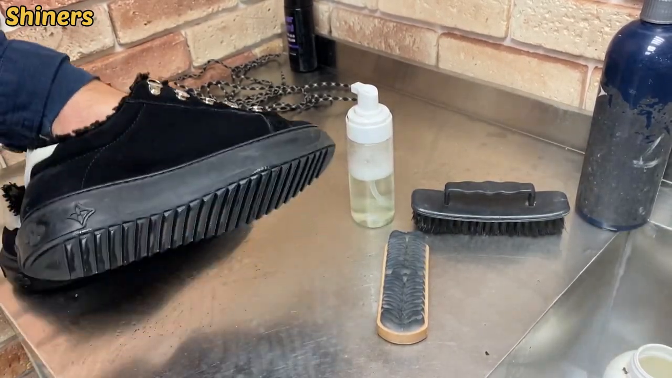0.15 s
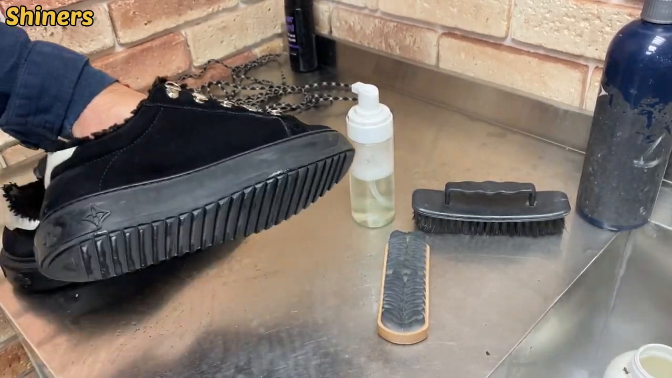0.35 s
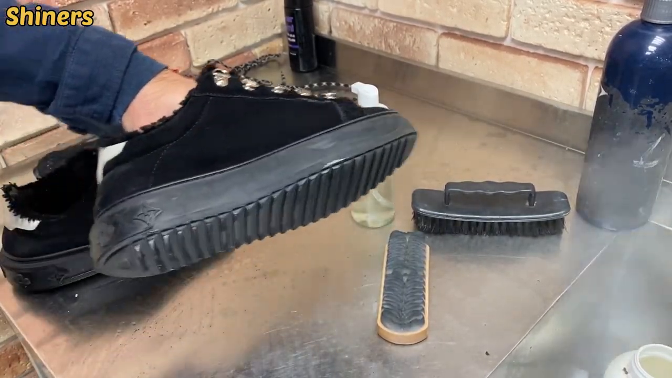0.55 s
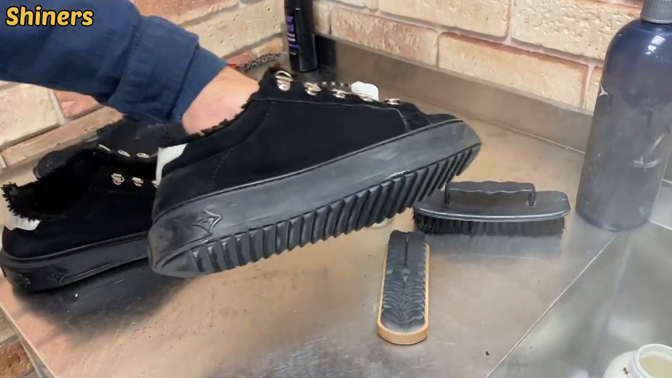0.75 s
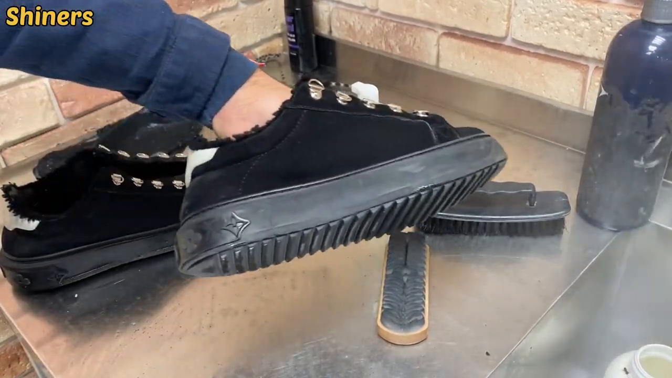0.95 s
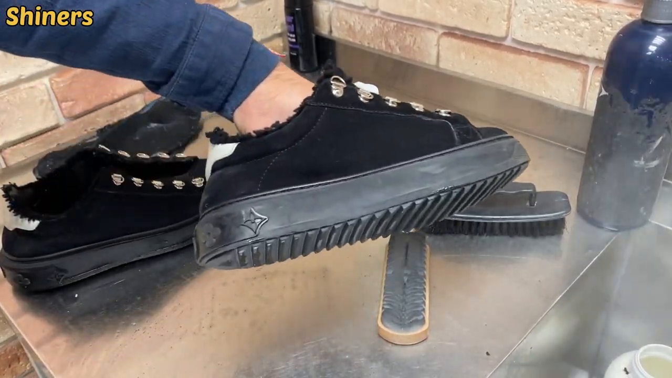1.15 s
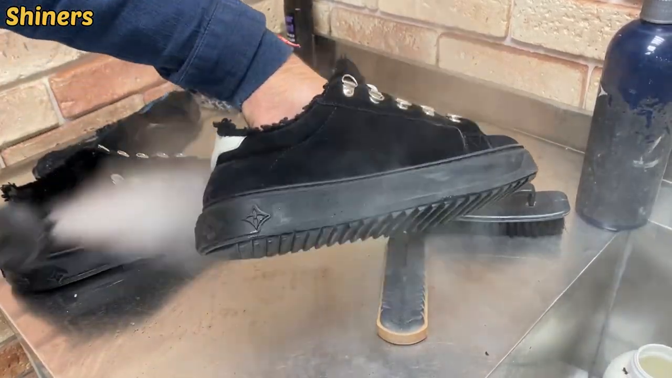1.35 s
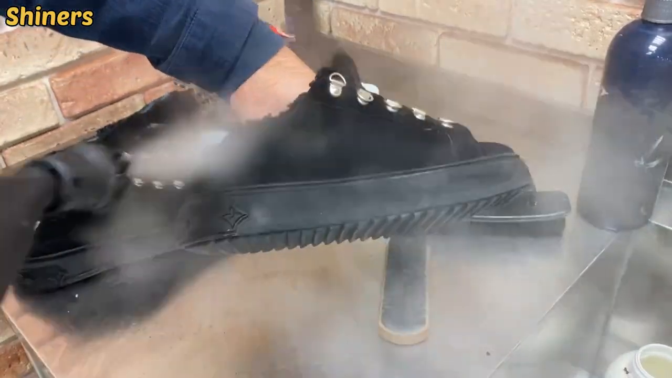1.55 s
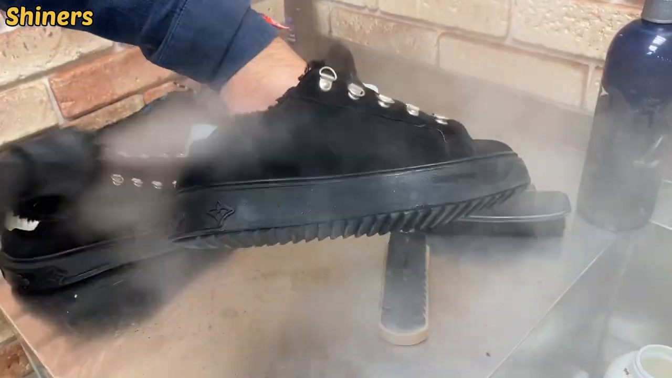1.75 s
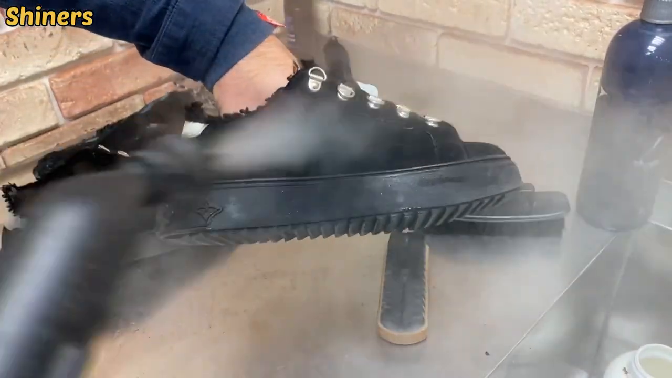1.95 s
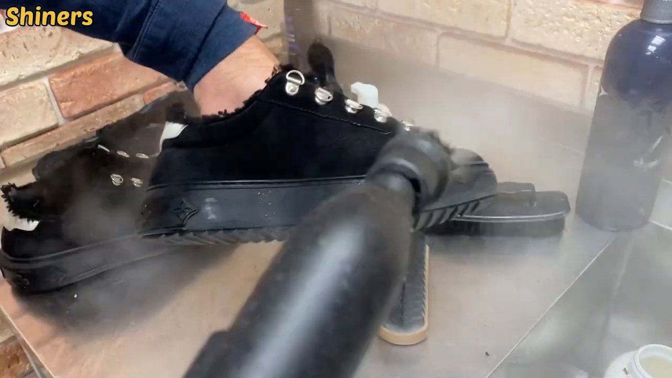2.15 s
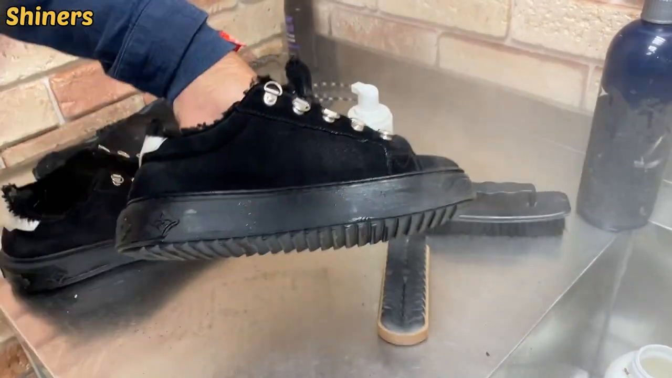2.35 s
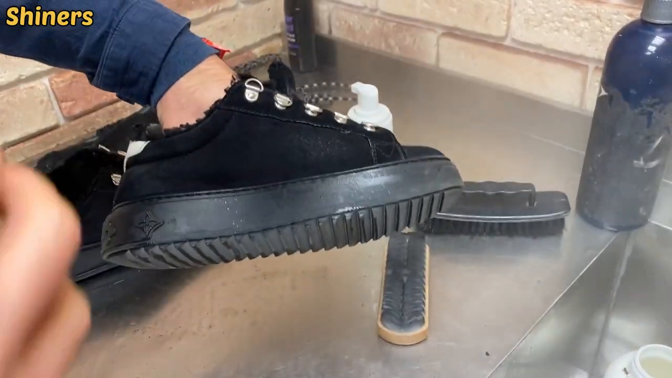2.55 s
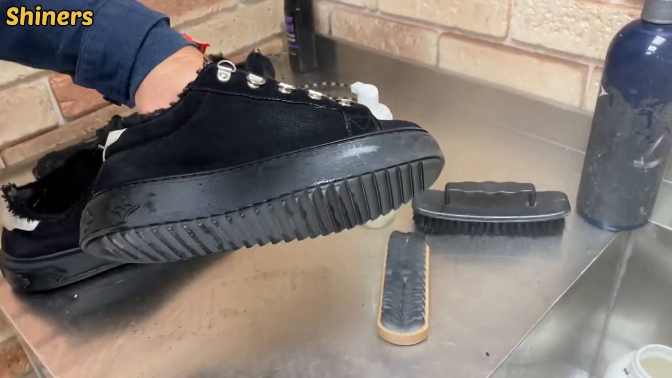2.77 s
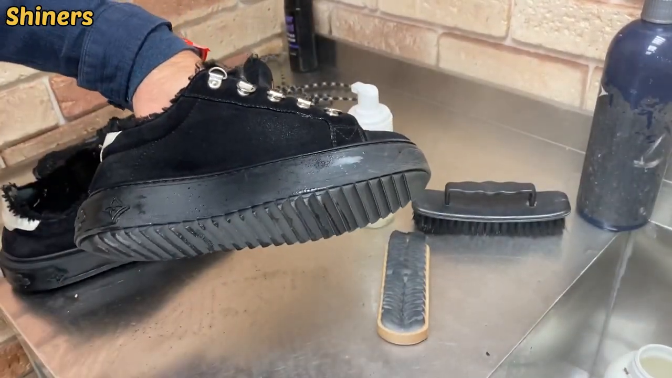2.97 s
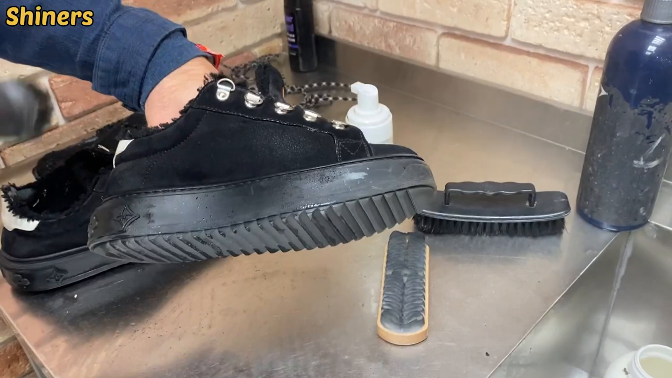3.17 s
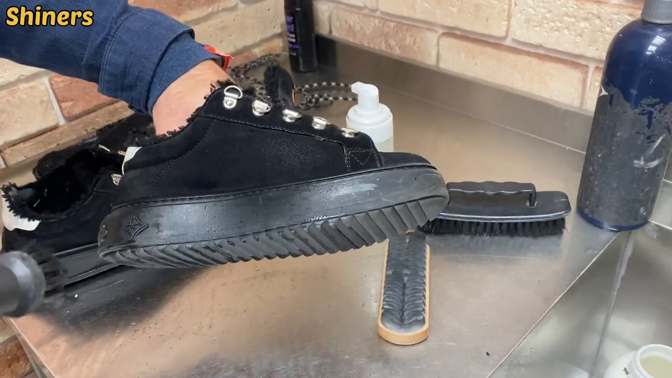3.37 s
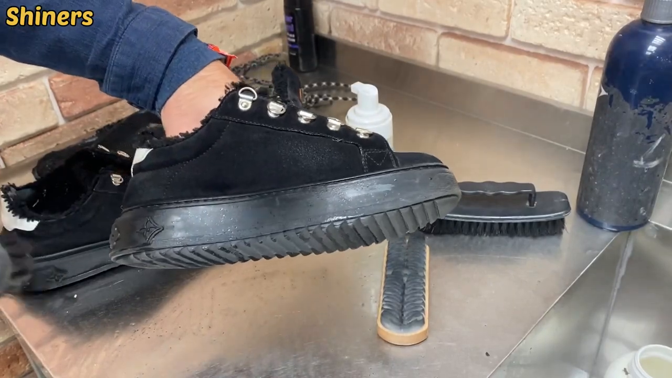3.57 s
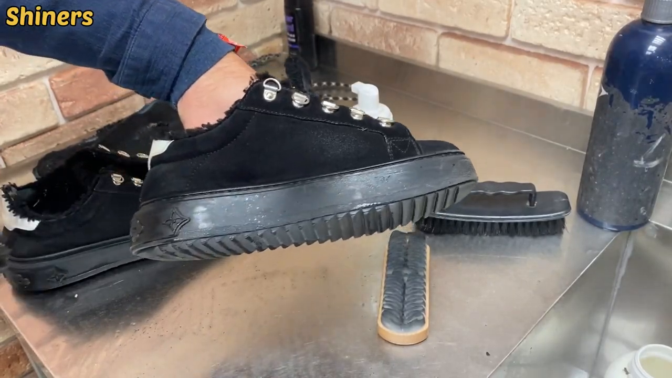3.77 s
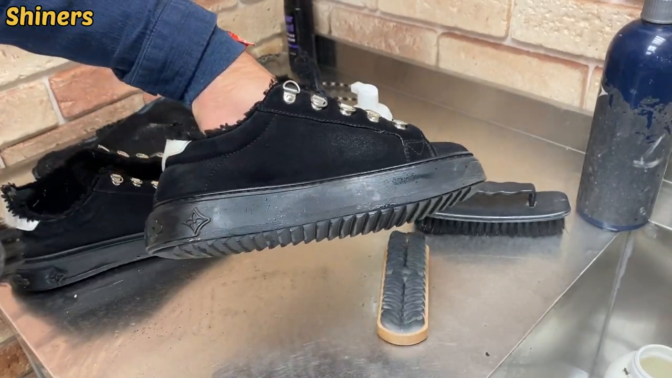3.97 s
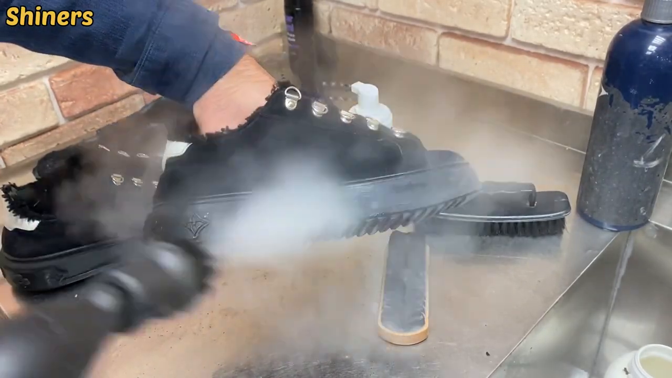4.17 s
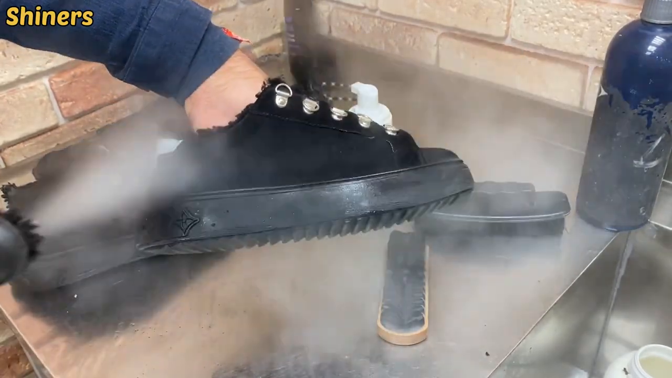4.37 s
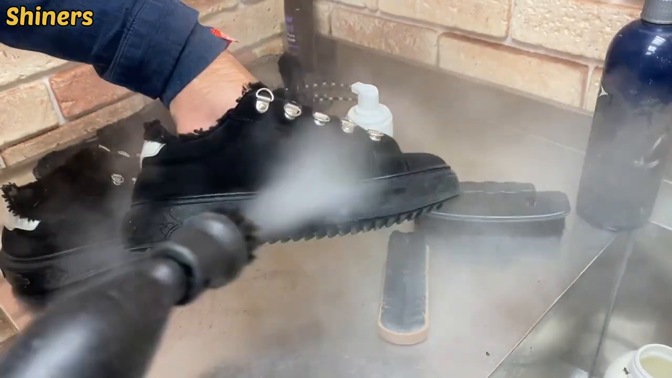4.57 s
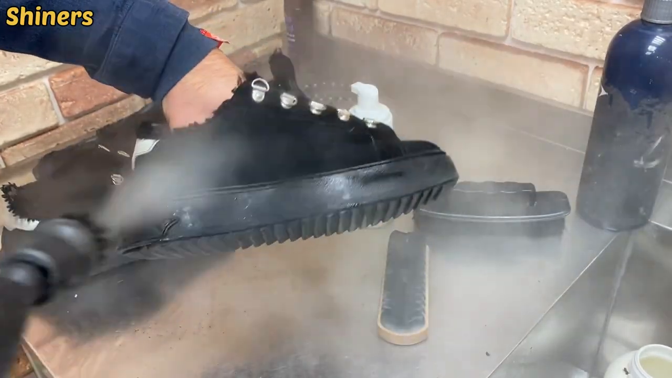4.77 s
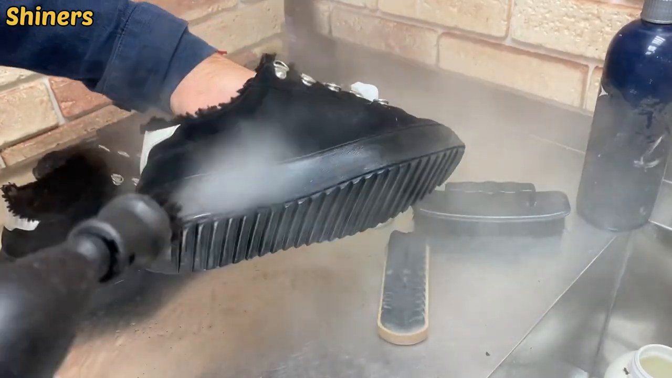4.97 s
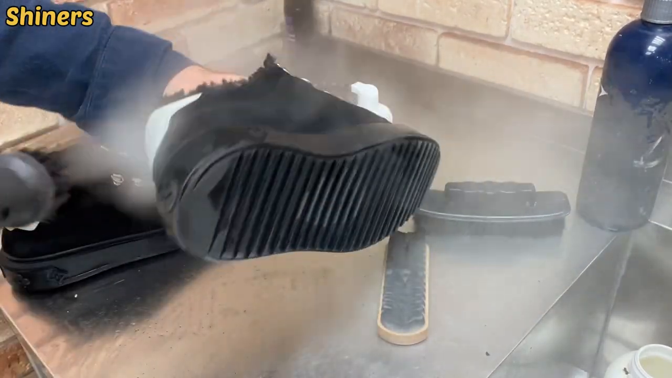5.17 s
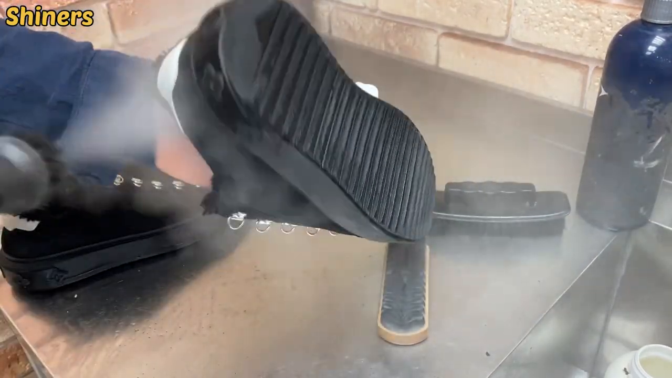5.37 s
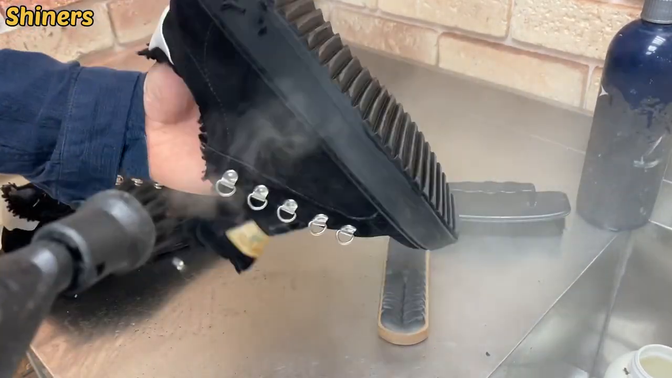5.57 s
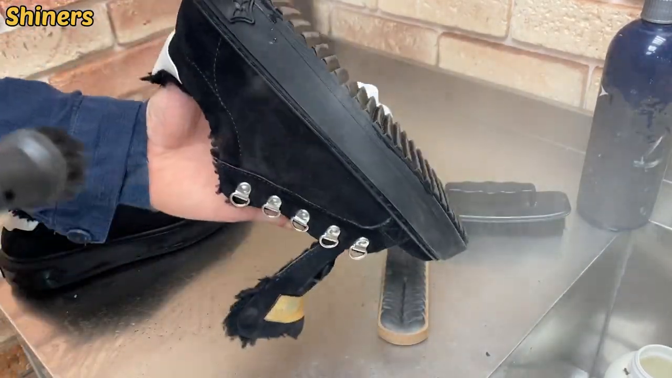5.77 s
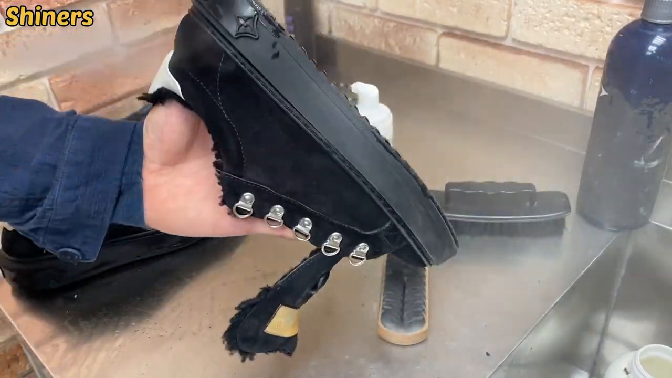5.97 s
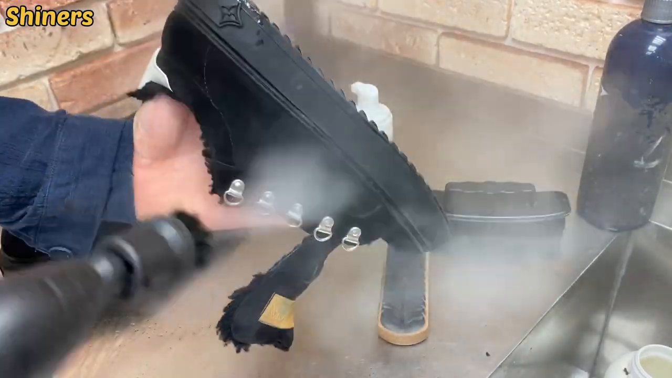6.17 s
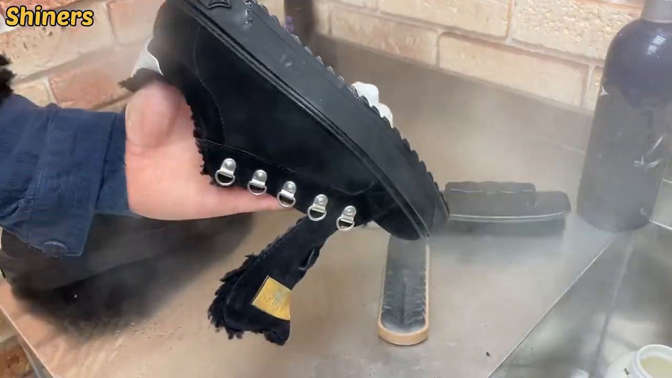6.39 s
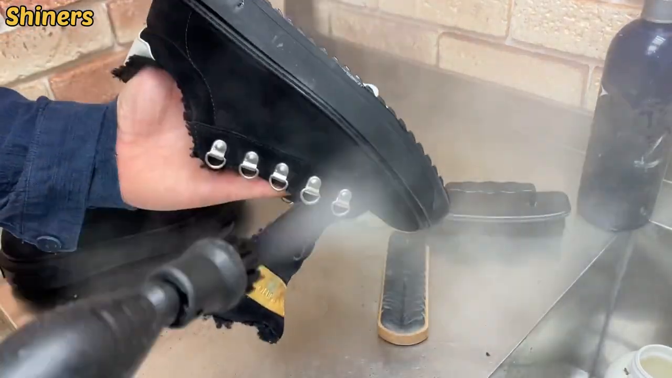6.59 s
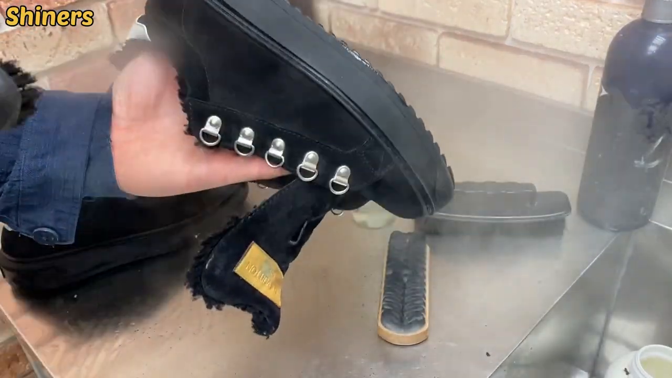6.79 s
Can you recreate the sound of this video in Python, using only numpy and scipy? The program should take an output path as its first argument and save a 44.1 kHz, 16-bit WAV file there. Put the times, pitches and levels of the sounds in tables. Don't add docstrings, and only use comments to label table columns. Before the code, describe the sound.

The tail of an earlier steam puff fades over low workshop rumble, then a steam gun blasts a suede shoe very close: two short wet bursts, then a longer one. In the pause the boiler gurgles, clicks, knocks and drips. A long fourth hiss and a last one follow, running to the end. Small hard-walled workshop, close stereo microphone leaning slightly left.

```python
import sys
import numpy as np
from scipy import signal
from scipy.fft import rfft, irfft
from scipy.io import wavfile
from scipy.ndimage import uniform_filter1d

SR = 44100
rng = np.random.default_rng(int(sys.argv[2]) if len(sys.argv) > 2 else 0)


def volts(x):
    e = np.asarray(x, float) / 20
    return 10 ** e


def master(y):
    cut = np.clip(np.atleast_2d(y).T, -1, 1)
    pcm = np.round(cut * 32767)
    wavfile.write(sys.argv[1], SR, pcm.astype(np.int16))


N = 301203
LEAD = SR // 2
QUADRATURE = np.pi / 2 * np.array([[0], [1]])


def evened(x):
    return x / np.sqrt(np.mean(x ** 2) + 1e-20)


def read(points, hz):
    f, value = np.transpose(points)
    return np.interp(np.log(hz + 1), np.log(f + 1), value)


def hiss(spectrum, length, patchy_db, streaky_db=0., size=1024):
    hz, frames = np.fft.rfftfreq(size, 1 / SR), 4 * length // size + 5
    a, b, chance = rng.standard_normal((frames, len(hz), 2, 3)).T
    patches = uniform_filter1d(chance[0], size=14, axis=0)
    patches = evened(uniform_filter1d(patches, size=8, axis=1))
    streaks = uniform_filter1d(chance[1], size=3, axis=0)
    streaks = evened(uniform_filter1d(streaks, size=30, axis=1))
    streaks = np.minimum(streaks, 1.3)
    level_db = read(spectrum, hz)[:, None] + patchy_db * patches + streaky_db * streaks
    z = (a + 1j * b) * volts(level_db)
    return evened(signal.istft(z, nperseg=size, noverlap=size * 3 // 4)[1][:, :length])


def wobble(length, hz):
    lowpass = signal.butter(1, hz, fs=SR, output="sos")
    return evened(signal.sosfiltfilt(lowpass, rng.standard_normal(length)))


def resonances(modes):
    hz = np.geomspace(100, 20000, num=900)
    gain = sum(volts(db) / (1 + (2 * (hz - f) / width) ** 2) for f, width, db in modes)
    return np.transpose([hz, 20 * np.log10(gain)])


def shell(modes):
    return hiss(resonances(modes), N, patchy_db=2.5)


def lumps(rows, rise_s, fall_db_per_s):
    t, gain = np.arange(N) / SR, np.zeros((2, N))
    for s, hold_s, db, upper_db in rows:
        part = slice(round(s * SR), round((s + hold_s + .4) * SR))
        u = t[part] - s
        fall = volts(-fall_db_per_s * np.maximum(u - hold_s, 0))
        gain[:, part] += volts([[db], [db + upper_db]]) * np.minimum(u / rise_s, 1) * fall
    return gain


def blips(rows, low, high, clear):
    size = 9000
    out, t = np.zeros((2, N + size)), np.arange(size) / SR
    low, high = np.pad([low, high], ((0, 0), (0, 0), (0, size)))
    rise = np.sin(np.pi / 2 * np.minimum(t / 0.0042, 1)) ** 2
    for s, db, hz, t60_s, width_hz, low_db, high_db in rows:
        part = slice(round(s * SR), round(s * SR) + size)
        peak = signal.iirpeak(hz, hz / width_hz, SR)
        noise = signal.lfilter(*peak, signal.lfilter(*peak, rng.standard_normal((2, size))))
        tone = np.sqrt(2) * np.sin(2 * np.pi * hz * t + QUADRATURE)
        ring = clear * tone + (1 - clear) * evened(noise)
        ring += volts(low_db) * low[:, part] + volts(high_db) * high[:, part]
        out[:, part] += ring * volts(db - 60 * t / t60_s) * rise
    return out[:, :N]


def struck(s, modes, rise_s, spread_db):
    t, out = np.arange(min(SR // 2, N - round(s * SR))) / SR, 0
    for (hz, db, t60_s), (phase, odd) in zip(modes, rng.standard_normal((len(modes), 2))):
        wave = np.sin(2 * np.pi * hz * t + 4 * phase + QUADRATURE)
        out = out + np.sqrt(2) * wave * volts(db + spread_db * odd - 60 * t / t60_s)
    return out * np.minimum(t / rise_s, 1) * np.minimum((t[-1] - t) / .1, 1)


def placed(blows):
    out = np.zeros((2, N))
    for s, sound in blows:
        out[:, round(s * SR):][:, :sound.shape[1]] += sound
    return out


# time_s, level_db
LOAD = [(0.0, -45), (0.25, -48.5), (0.42, -38), (0.68, -54.5), (0.78, -40.5), (1.16, -47.5), (1.48, -44),
        (2.68, -55.5), (2.78, -45.5), (3.73, -56), (4.13, -48.5), (5.4, -52.5), (5.55, -48), (5.76, -63.5),
        (6.03, -48), (6.83, -50)]
# freq_hz, density_db
RUMBLE_COLOUR = [(8.8, -41), (15, -8.5), (43, -8), (59, -1.5), (76, 4.5), (87, -6.5), (97, -14.5),
                 (110, -28.5), (140, -52.5), (240, -120)]
# freq_hz, density_db
HUM_COLOURS = [
    [(95, -42.5), (116, -15.5), (125, 13), (134, -9), (160, -53), (300, -120)],
    [(170, -38), (205, -15.5), (215, 2.5), (225, -7), (260, -42.5), (450, -120)],
]
# steam_roar_db, gurgle_db, rumble_db, fall_db_per_s
HUM_STIR = [(-17, -14.5, -11, 78), (-19.5, -27.5, -25.5, 91.5)]
# freq_hz, density_db
AIR_COLOUR = [(150, -6.5), (600, -20.5), (1500, -34.5), (3000, -40), (4800, -40), (5700, -46.5),
              (7500, -40.5), (12500, -39), (13600, -92)]
AIR_LEVEL_DB, WHINE_LEVEL_DB = -63.5, -90
# freq_hz, width_hz, level_db
FAN_MODES = [(3930, 40, 0), (3750, 120, -9), (4780, 40, -4), (1750, 150, -7)]


def workshop():
    t = np.arange(-LEAD, N) / SR
    load = volts(np.interp(t, *np.transpose(LOAD)))
    roar = valve(t)[1]
    water = np.pad(gurgle_gains()[0], (LEAD, 0))
    gains = [load * volts(0.84)]
    for roar_db, water_db, load_db, fall_db_per_s in HUM_STIR:
        drive_db = 20 * np.log10(volts(roar_db) * roar + volts(water_db) * water + 1e-9)
        held_db = np.maximum.accumulate(drive_db + fall_db_per_s * t) - fall_db_per_s * t
        gains.append(volts(held_db) + volts(load_db) * load)
    out = volts(AIR_LEVEL_DB) * hiss(AIR_COLOUR, N, patchy_db=1.6) + volts(WHINE_LEVEL_DB) * shell(FAN_MODES)
    for colour, gain in zip([RUMBLE_COLOUR, *HUM_COLOURS], gains):
        out = out + hiss(colour, N, patchy_db=2.5, size=4096) * gain[LEAD:]
    return out


# start_s, hold_s, low_modes_db, high_modes_db (re low)
GURGLE_LUMPS = [(0, 0.12, -57.5, -2.5), (0.144, 0.033, -57.5, 4), (0.463, 0.022, -50.5, -28.5),
                (0.559, 0.39, -58, -3), (1.025, 0.099, -62, -28), (1.2, 0.053, -51, -14),
                (2.2, 0.17, -43.5, -10), (2.536, 0.019, -61.5, -3), (2.656, 0.01, -45, -13),
                (2.703, 0.03, -47, -21), (2.752, 0.019, -42, -18), (2.803, 0.043, -52.5, 14.5),
                (2.889, 0.208, -40, -18), (3.142, 0.14, -49.5, -13), (3.347, .015, -57, -28),
                (3.523, 0.014, -51, -30), (3.851, 0.018, -44.5, -22), (4.057, 0.018, -58, -18),
                (5.5, 0.0067, -47, -9), (5.57, 0.014, -54, -10), (5.913, .03, -69, -25)]


def gurgle_gains():
    return lumps(GURGLE_LUMPS, rise_s=0.015, fall_db_per_s=169)


# freq_hz, width_hz, level_db
SHELL_MODES = [
    [(170, 45, 0.5), (270, 55, 1), (318, 24, 2), (385, 40, 1), (478, 50, -11), (578, 86, 2),
     (630, 19, -5.5), (700, 70, -15)],
    [(760, 60, -2), (860, 60, -7), (940, 37, -4), (1030, 60, -4.5), (1050, 50, -4.5), (1280, 180, -12)],
]


def gurgle():
    low, high = (shell(modes) * gain for modes, gain in zip(SHELL_MODES, gurgle_gains()))
    return volts(-5.5 + 1.51 * wobble(N, hz=30)) * (low + volts(-0.5) * high)


# start_s, level_db, pitch_hz, t60_s
BENCH_RINGS = [(0, -53, 212, 1.1), (.40, -49, 210.6, 1.26), (.40, -54, 251, 0.78), (.3, -46, 124.4, 0.84),
               (0.931, -52, 281.4, 0.79), (1.05, -49, 127.4, 2.5), (2.149, -56, 187, .9),
               (2.3, -46, 127, 0.57), (2.36, -42.5, 71.2, 1.1), (2.721, -44, 67.3, 1),
               (2.881, -43, 70, 0.73), (2.94, -45.5, 127.5, 0.77), (3.03, -50.5, 190, 1.35),
               (3.3, -53, 76.7, 2), (3.851, -48, 70.3, 3.2)]


def bench():
    return placed([(s, struck(s, [(hz, db, t60_s)], rise_s=.04, spread_db=0))
                   for s, db, hz, t60_s in BENCH_RINGS])


# time_s, pressure_db, splash_db
PUFF_BEFORE = [
    (-.4, -17.5, 0.0061),
    (-.15, -9.5, 0.0016),
]
# time_s, pressure_db, splash_db
SHORT_BLASTS = [
    [(.202, -19.5, 14), (.219, -10, 6.5), (.245, -12.5, 1.9), (.28, -10.5, 1.5), (.31, -15.5, 1.5),
     (.373, -16, -1), (.388, -24, 2.5)],
    [(.7295, -27, 4.5), (.757, -11, 1.9), (.795, -14.5, -6.5), (.9, -14.5, -11), (.918, -26, 7)],
]
# time_s, pressure_db, splash_db
LONG_BLASTS = [
    [(1.239, -24.5, 6.5), (1.261, -16, 0.5), (1.4, -16, 0), (1.585, -19, -0.5), (1.715, -17, -2.5),
     (1.76, -20, -1), (2.08, -19.5, -6), (2.112, -24.5, -5), (2.142, -25.5, -0.5)],
    [(4.091, -29, 2.4), (4.129, -18, -6.5), (4.23, -15.5, -0.5), (4.31, -19, -1.5), (4.735, -21.5, 1.5),
     (4.76, -22.5, -16.5), (5.1, -24.5, -0.5), (5.44, -23.5, -15), (5.472, -29, 2.3)],
    [(5.957, -22, 13), (5.968, -29, -4.5), (6.003, -18.5, 1), (6.09, -20.5, -5), (6.22, -20.5, 2.5),
     (6.385, -24, -4), (6.44, -22.5, 5.5), (6.56, -22.5, -3.5), (6.83, -24.5, -0.8)],
]
JET_CORE_DB = [1.6, 0.25, 0.61, 2, 2, 1.9]
# roar_db, rush_db, fizz_db, hollow_db, tube_db
SHOE_AIM = [(-29, -19.5, -16, -47.5, -38.5), (-31, -23.5, -21.5, -36.5, -26.5),
            (-27, -21.5, -19.5, -31, -33), (-30, -22.5, -16, -32, -41.5), (-32.5, -23, -16, -37.5, -45.5),
            (-34, -24.5, -14.5, -43.5, -43)]
# peak_s, rise_db
PRESSURE_SURGES = [(1.31, 0), (1.45, 3), (1.54, -1), (1.8, -2), (1.88, 1.5), (1.95, 3), (2.0, -3),
                   (2.07, 1), (4.45, 1), (4.9, 1), (5.03, 3), (5.33, 0), (6.58, 0.5)]
FULL_DB, SURGE_S = -16, .025
OPEN_S, FIZZ_OPEN_S, SHUT_S = .007, 0.032, .013


def valve(t):
    gain = np.zeros((6, len(t)))
    surge_db = sum(np.interp(t, [s - 2 * SURGE_S, s, s + 2 * SURGE_S], [0, db, 0])
                   for s, db in PRESSURE_SURGES)
    rise_s = np.array([OPEN_S] * 3 + [FIZZ_OPEN_S] * 3)[:, None]
    blasts = [PUFF_BEFORE, *SHORT_BLASTS, *LONG_BLASTS]
    for rows, jet_db, aim in zip(blasts, JET_CORE_DB, SHOE_AIM):
        roar_db, rush_db, fizz_db, hollow_db, tube_db = aim
        s, db, splash_db = np.transpose(rows)
        over = np.interp(t, s, db) + surge_db - FULL_DB
        splash = np.interp(t, s, splash_db)
        levels_db = [FULL_DB + jet_db + over,
                     roar_db + 0.69 * over + .28 * splash,
                     rush_db + 0.79 * over + 0.16 * splash,
                     fizz_db + 0.87 * over,
                     hollow_db + 0.52 * over + 1.4 * splash,
                     tube_db + .6 * over]
        opening = np.clip((t - s[0]) / rise_s, 0, 1)
        shutting = np.clip((s[-1] - t) / SHUT_S + 1, 0, 1)
        gain += volts(levels_db) * opening * shutting
    return gain


# freq_hz, t60_s
ROOM_T60 = [(200, 0.49), (800, 0.39), (3000, 0.33), (7000, 0.31), (12000, 0.22), (14000, 0.24),
            (16000, 0.13)]
# freq_hz, level_db
WALL_TINT = [(200, -1), (2000, -1), (4500, -2), (7200, -2), (8500, -2), (12000, -1.5), (16000, 0)]
ROOM_LEVEL_DB = -12
LATE_DB, LATE_STRETCH = -16, 2.1
SWALLOW_S, SWALLOW_DB_PER_S = 0.28, 220


def room(x):
    hz, t, z = signal.stft(rng.standard_normal((2, SR)), SR, nperseg=256)
    fall_db = -60 * t / np.clip(read(ROOM_T60, hz), .05, 2)[:, None]
    z = z * volts(read(WALL_TINT, hz)[:, None] - SWALLOW_DB_PER_S * np.maximum(t - SWALLOW_S, 0))
    z = z * np.hypot(volts(fall_db), volts(LATE_DB + fall_db / LATE_STRETCH))
    tail = signal.istft(z, SR, nperseg=256)[1][:, 200:]
    tail = tail / np.linalg.norm(tail[0])
    return volts(ROOM_LEVEL_DB) * signal.fftconvolve(x, tail, axes=1)[:, :x.shape[1]]


# freq_hz, density_db
JET_COLOUR = [(3500, -46.5), (5000, -19), (6300, -7.5), (7300, -1.5), (8500, -2), (10000, -9.5),
              (13000, -32)]
ROAR_COLOUR = [(80, -35.5), (130, -10), (210, -8.5), (270, -4.5), (450, -8.5), (900, -3), (1300, -5.5),
               (1700, -2.5), (2000, -26), (3500, -23), (9000, -63.5)]
RUSH_COLOUR = [(900, -24.5), (1700, -8.5), (2400, -6), (3200, -5), (4200, -3.5), (5300, -0.5), (6500, -5),
               (9000, -31.5)]
FIZZ_COLOUR = [(6000, -30), (8500, -6.5), (10000, -1.5), (12000, -1), (13500, -4.5), (15500, -9),
               (17000, -42.5)]
# freq_hz, density_db
HOLLOW_COLOUR = [(100, -34), (150, -13.5), (200, -4), (250, 0), (320, -7.5), (400, -14), (600, -61.5),
                 (2000, -100)]
# freq_hz, width_hz, level_db
TUBE_MODES = [(960, 56, -8.5), (444, 40, -2), (1111.6, 12, 2.5), (1725, 100, -7), (2355, 170, -4.5),
              (4174, 70, 3.5), (5320, 61, 5.5)]


def steam():
    t = np.arange(-LEAD, N) / SR
    flutter, crackle = wobble(len(t), hz=24.7), wobble(len(t), hz=405)
    # colour, patchy_db, streaky_db (whistling), flutter_db, crackle_db
    parts = [(JET_COLOUR, 1.2, 3.3, 1.1, .8),
             (ROAR_COLOUR, 1, 1.8, 1.8, .8),
             (RUSH_COLOUR, .6, 2.6, 1.2, .8),
             (FIZZ_COLOUR, 1.6, 3, 1.1, .8),
             (HOLLOW_COLOUR, 1.5, 1.5, 1.8, .3),
             (resonances(TUBE_MODES), 2, 1, 1.5, .3)]
    jet = 0
    for gain, (colour, patchy_db, streaky_db, flutter_db, crackle_db) in zip(valve(t), parts):
        gain = gain * volts(flutter_db * flutter + crackle_db * crackle)
        jet = jet + hiss(colour, len(t), patchy_db, streaky_db) * gain
    return (jet + room(jet))[:, LEAD:]


# peak_s, level_db, pitch_hz
SLUGS = [(0.222, -12, 6550), (0.224, -10.5, 899), (0.238, -15.5, 460), (0.255, -18, 293), (0.266, -14, 454),
         (0.276, -22, 1115), (.288, -20, 300), (0.337, -21, 270), (.356, -20, 300), (0.747, -17.5, 895),
         (.762, -12.5, 266), (.778, -17, 1136), (1.254, -22, 810), (1.45, -15, 295), (4.089, -31, 253),
         (4.146, -18, 271), (4.146, -19, 760), (4.145, -26.5, 530), (4.208, -20.5, 235),
         (4.384, -21.5, 243), (4.651, -31, 258), (4.969, -33.5, 216), (5.096, -32, 540),
         (5.125, -25.5, 285), (5.396, -28, 617), (5.482, -41, 302), (5.499, -38, 550), (5.513, -51, 500),
         (6.004, -20.5, 280), (6.045, -31.5, 296), (6.2, -27.5, 236), (6.432, -22, 270)]


def spits():
    rows = [(s - .006, db - 0.5, hz, .06, 200, -12, -15) for s, db, hz in SLUGS]
    low, high = hiss(ROAR_COLOUR, N, patchy_db=4.0), hiss(RUSH_COLOUR, N, patchy_db=0.0)
    return blips(rows, low, high, clear=0.68)


# start_s, hold_s, trickle_db, mist_db (re trickle)
TRICKLE_LUMPS = [(2.363, 0.014, -60, -19), (2.485, 0.085, -68.5, -2.5), (2.654, 0.011, -56, -10),
                 (2.702, 0.071, -68, -10), (2.77, .015, -62, -24), (2.808, 0.05, -48, -22),
                 (2.929, 0.052, -67.5, -23), (2.998, 0.11, -65, -27), (3.16, 0.17, -74.5, -13),
                 (3.363, 0.049, -73, -7), (3.468, 0.086, -80, -5), (3.861, 0.038, -88.5, -12),
                 (2.9, 0.614, -81, -1), (3.5, 0.11, -86, -1), (3.905, .008, -86.5, -16),
                 (4.035, .015, -78, -19), (5.726, 0.016, -70, -13), (5.886, .03, -86, -17),
                 (5.857, 0.016, -79, -15), (5.808, .1, -96, 4)]
# freq_hz, density_db
TRICKLE_COLOUR = [(700, -10), (1200, -3), (1450, 3), (1650, -1), (1900, 0), (2300, -5), (3000, -7),
                  (4000, -9), (5000, -11), (6200, -24), (8000, -50), (14000, -90)]
# freq_hz, density_db
MIST_COLOUR = [(4000, -30), (6500, 0), (10000, -2), (12500, -6), (13500, -16), (14200, -60)]


def trickle():
    trickle_gain, mist_gain = lumps(TRICKLE_LUMPS, rise_s=0.0093, fall_db_per_s=307)
    thin = hiss(TRICKLE_COLOUR, N, patchy_db=1.6) * trickle_gain
    mist = hiss(MIST_COLOUR, N, patchy_db=1.6) * mist_gain
    return volts(-2.0) * thin + mist


# start_s, level_db
SWITCH_CLICKS = [
    (2.656, -66),
    (2.927, -78),
    (2.375, -76),
]
# freq_hz, level_db, t60_s
SWITCH_MODES = [(1900, -2, .04), (3100, -4, .03), (4500, 1, .08), (4900, 2, .07), (6800, -6, .02),
                (10200, -2, .015), (11300, -1, .015), (12300, -3, .012)]


def clicks():
    return placed([(s, volts(db) * struck(s, SWITCH_MODES, rise_s=.0005, spread_db=1))
                   for s, db in SWITCH_CLICKS])


# start_s, level_db, top_modes_db (re low)
DRIPS = [(3.364, -49, -17), (3.521, -59, -20), (3.545, -61.5, -20), (3.69, -50, -13), (3.712, -49, -13.5),
         (3.816, -47.5, -11), (3.839, -56, -14.5), (3.87, -64, -19), (3.905, -49, -12), (3.926, -51, -15),
         (3.982, -48, -13), (4.004, -46, -14), (4.034, -42.5, -11), (4.06, -55, -18), (2.657, -40, -9),
         (2.904, -49, -12), (2.933, -45, -12), (3.032, -46, -3), (3.076, -45.5, -3), (3.1, -47, -8),
         (3.238, -53, -7), (3.285, -53, -9), (5.738, -64, -4.5), (5.862, -73, 2), (5.908, -63, -9)]
# freq_hz, level_db, t60_s
DRIP_MODES = [
    [(268.6, -3, 0.12), (317.3, -4.5, 0.26), (379, -3, 0.072), (463, -15, 0.09), (585, -11, 0.12),
     (645, -20, 0.096)],
    [(790, -8.5, .12), (926, -9, 0.089), (1050, -9, 0.14), (1400, -20, 0.098)],
]


def drips():
    low, top = DRIP_MODES
    blows = []
    for s, db, top_db in DRIPS:
        modes = [*low, *((hz, mode_db + top_db, t60_s) for hz, mode_db, t60_s in top)]
        blows.append((s, volts(db) * struck(s, modes, rise_s=.003, spread_db=2.5)))
    return placed(blows)


# peak_s, level_db, pitch_hz, t60_s, high_modes_db (re peak)
BOILER_KNOCKS = [(2.663, -35, 270, 0.46, -14), (2.666, -37, 590, 0.17, -19), (2.767, -41, 427, 0.3, -15),
                 (2.776, -27, 427, 0.23, -18), (2.815, -40, 970, 0.13, -8), (2.832, -43, 1050, 0.14, -16),
                 (2.872, -40, 940, 0.13, -14), (2.852, -32, 913, 0.14, -18), (2.93, -45, 318, 0.16, -18),
                 (2.971, -35, 583, 0.12, -23), (3.013, -37, 330, 0.18, -10.5),
                 (3.053, -34.5, 326, 0.36, -12), (3.09, -39, 409, .15, -12), (3.173, -43, 257, 0.21, -14),
                 (3.193, -39, 656, 0.26, -13.5), (3.268, -44.5, 318, 0.23, -12.5),
                 (3.528, -47.5, 630, 0.15, -25), (3.873, -56, 700, 0.1, -21), (5.737, -55, 540, 0.2, -5),
                 (5.87, -65, 700, 0.087, -1), (5.912, -53, 292, 0.22, -12.5)]


def knocks():
    rows = [(s - .003, db - 6.5, hz, t60_s, 70, -3, high_db)
            for s, db, hz, t60_s, high_db in BOILER_KNOCKS]
    return blips(rows, *map(shell, SHELL_MODES), clear=0.73)


def scene():
    refill = gurgle() + trickle() + clicks() + drips() + knocks()
    return workshop() + bench() + steam() + spits() + refill


def low_pass(x):
    return signal.sosfilt(signal.butter(12, 15780, fs=SR, output="sos"), x)


# freq_hz, share_0_to_1
PORT_SAME = [(30, .985), (100, .965), (300, .8), (600, .62), (1500, .55), (2800, .45), (4000, .95),
             (5600, .55), (6700, .92), (8500, .999), (16000, .998)]
# freq_hz, level_db
PORT_LEAN = [(60, -.5), (200, .8), (800, 2.7), (2600, 4.8), (4000, 6.5), (5200, 4), (7000, 1.5), (8600, 0),
             (16000, 0)]
# freq_hz, phase_rad
PORT_LAG = [(100, 0), (430, .8), (950, .7), (1400, 1.4), (2300, .5), (3200, 0), (6400, .3), (7000, 0)]
SLIP_FROM_HZ, SLIP_TURN_HZ, EDGE_HZ = 6830, 4320, 16050


def record(dry):
    hz = np.fft.rfftfreq(N, 1 / SR)
    a, b = rfft(dry)
    same = np.clip(read(PORT_SAME, hz), 0, 1)
    slip_turns = np.maximum(hz - SLIP_FROM_HZ, 0) / SLIP_TURN_HZ
    slip = np.exp(2j * np.pi * slip_turns - 1j * read(PORT_LAG, hz))
    ports = np.array([a, (same * a + np.sqrt(1 - same ** 2) * b) * slip])
    ports *= volts(read(PORT_LEAN, hz) * np.array([[.5], [-.5]]))
    ports *= np.clip((EDGE_HZ - hz) / 200, 0, 1)
    mix = np.clip(irfft(ports, N), -1, 1)
    return low_pass(mix)


dry = scene()
out = record(dry)
master(out)
```